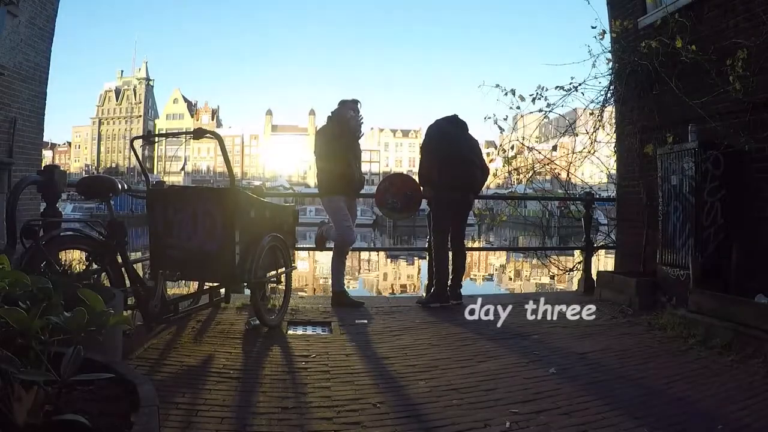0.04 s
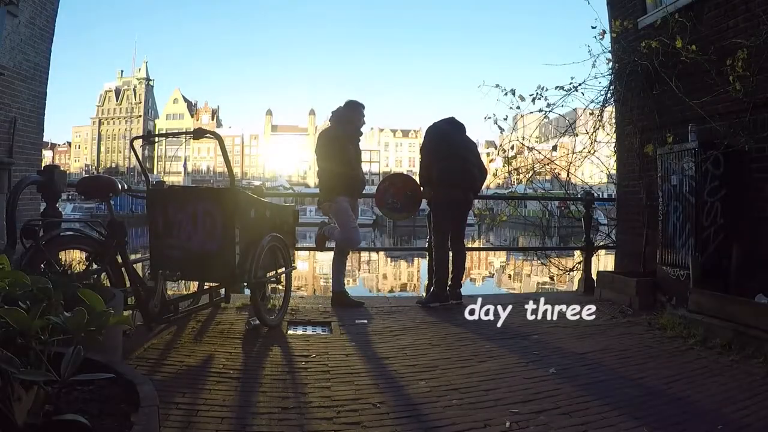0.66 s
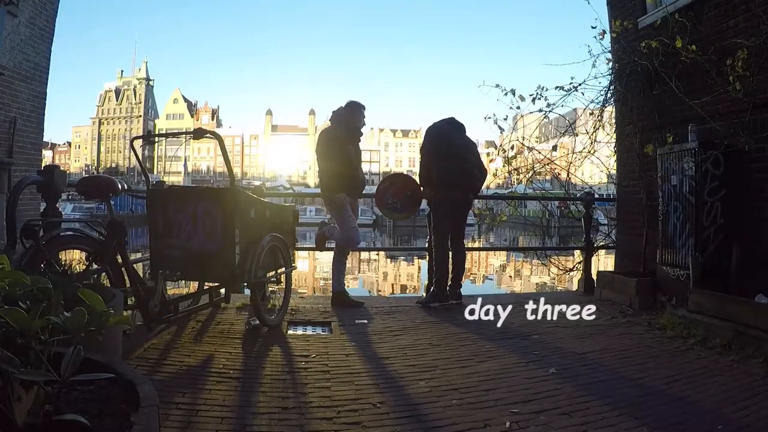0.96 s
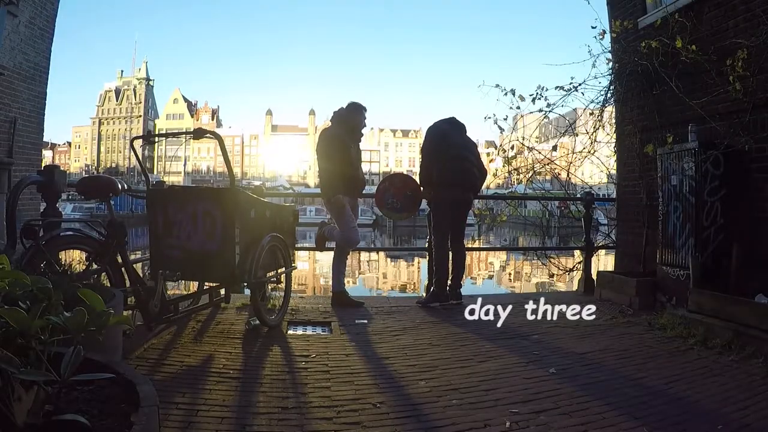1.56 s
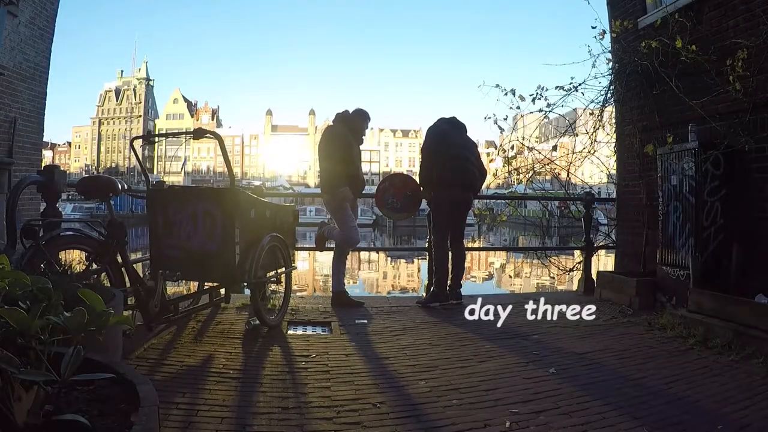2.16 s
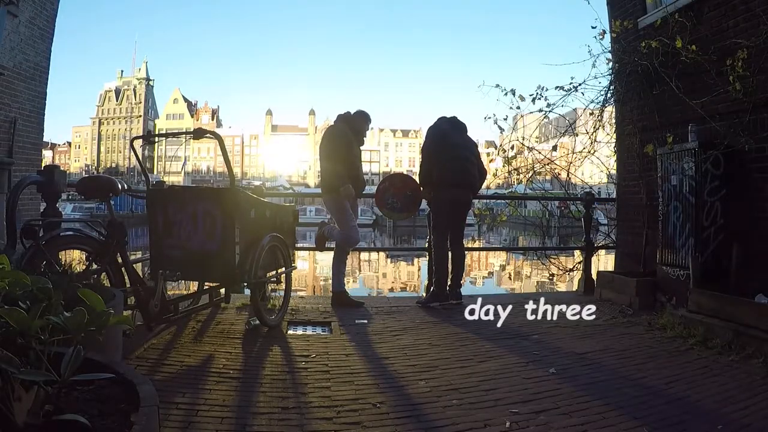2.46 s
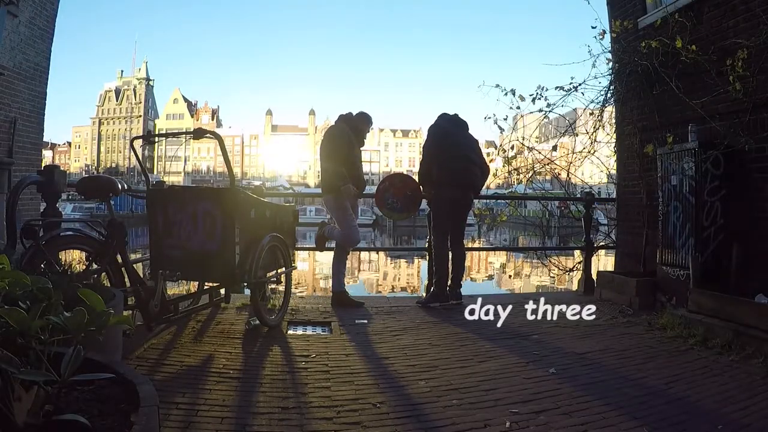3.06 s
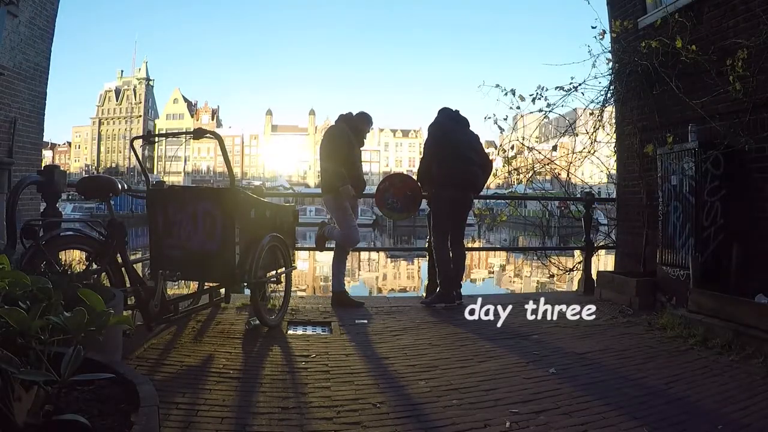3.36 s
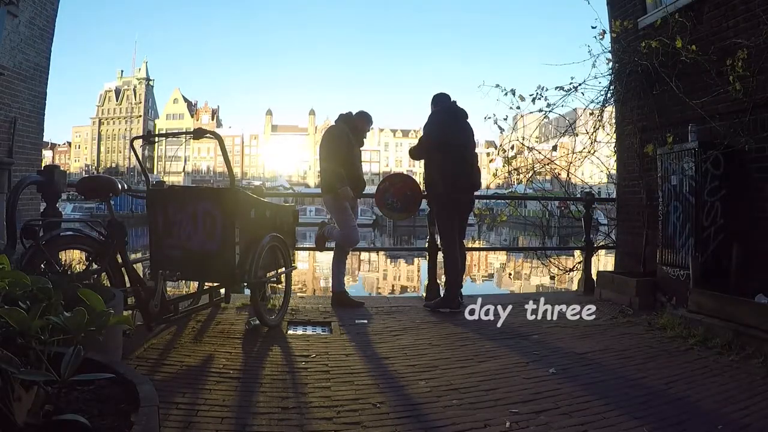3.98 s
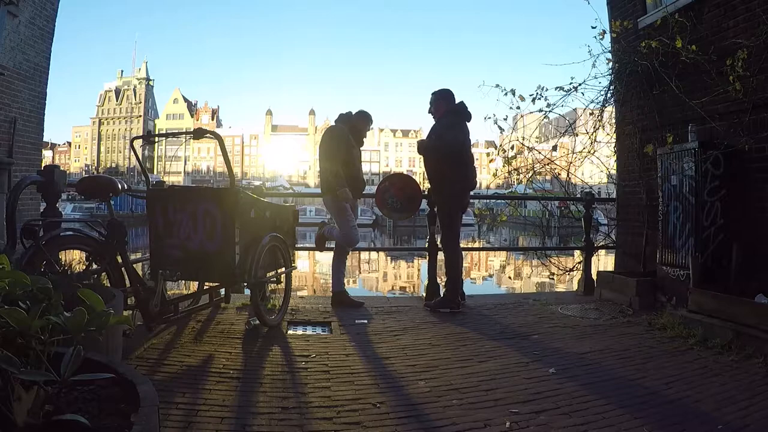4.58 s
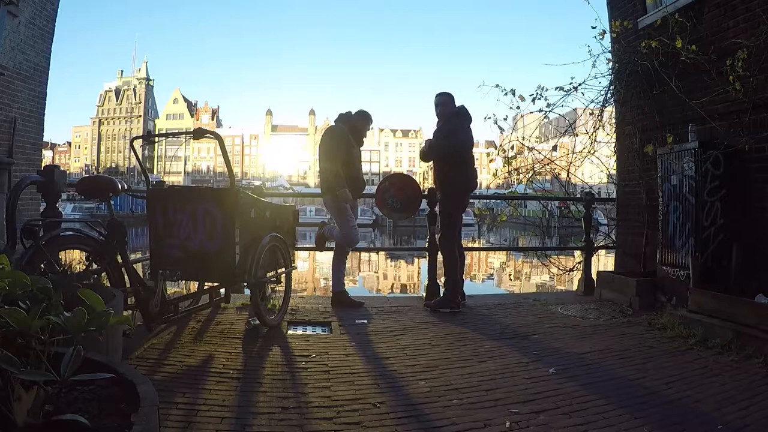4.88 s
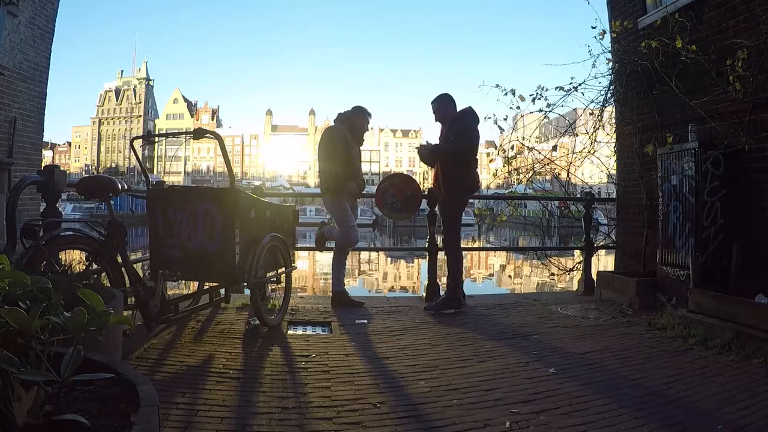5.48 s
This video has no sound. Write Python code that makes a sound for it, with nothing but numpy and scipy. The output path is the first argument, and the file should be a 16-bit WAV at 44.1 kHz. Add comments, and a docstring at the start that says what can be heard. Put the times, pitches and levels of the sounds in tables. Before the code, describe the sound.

Distant city traffic rumbles steadily beside a canal, with a wash of tyres, faint brake squeaks and a soft jacket rustle.

```python
"""A quiet city canal, heard from a brick passage. Distant traffic blurs into a steady rumble,
with the wash of tyres above it and the hum and drone of far engines. Brakes squeak faintly between
the houses, and the cloth of a winter jacket rubs and rustles a few steps away.
A small camera with two microphone ports adds its own hiss. Faint, steady high tones lie over it all."""
import sys
import numpy as np
from scipy import signal
from scipy.fft import rfft, irfft
from scipy.io import wavfile
from scipy.ndimage import uniform_filter1d

SR = 44100
rng = np.random.default_rng(int(sys.argv[2]) if len(sys.argv) > 2 else 0)


def waveform_to_disk(signal):
    """Save audio, clipped to [-1, 1], as 16-bit WAV at the path in sys.argv[1]."""
    frames = np.transpose(np.atleast_2d(signal))
    scaled = np.clip(frames, -1, 1) * 32767
    samples = np.round(scaled).astype(np.int16)
    wavfile.write(sys.argv[1], SR, samples)


N = 244118
TIME = np.arange(N) / SR
BINS = np.fft.rfftfreq(N, 1 / SR)

# the street's sound field at the two ports: f/Hz, coherence, left phase lead/rad, left minus right/dB
PORTS = [(30, 0.93, -0.069, -1.5), (87, 1, 0.0057, 0.5), (324, 0.95, 0.087, -1.5), (456, 0.89, 0.44, -2),
         (613, 0.65, -0.57, -3), (770, 0.02, 0.28, -3.5), (950, 0.51, -1.4, -1.5), (1480, 0.8, -1.56, -1.5),
         (2180, 0.5, -1.4, -1.1), (3040, 0.4, -0.067, -1), (4070, 0.82, -0.26, -0.5), (5200, 0.5, 0.86, -3)]


def rumble(level_db=-31, throb_db=0.17, lull_below_hz=234):
    """Incoherent summation: many vehicles blur to a roar whose long waves reach both ports alike."""
    spectrum = [(30, -3.5), (48, -2), (68, -1.5), (85, 1), (105, -2), (132, -1.5), (168, -9.5),
                (300, -11.5), (365, -14), (410, -21), (700, -33), (1500, -70.5)]  # traffic noise: f/Hz, relative spectral level/dB
    lulls = [(.91, 0.12, -2), (2.874, 0.066, -5.5), (3.266, 0.16, -4), (4.86, 0.22, -2.5)]  # brief dips of the bass: t/s, length/s, gain/dB
    roar = noise(spectrum, *per_bin(PORTS))
    running_rms = np.sqrt(uniform_filter1d((roar ** 2).mean(0), size=SR // 4))
    roar = roar / running_rms
    bass = irfft(rfft(roar) / (1 + (BINS / lull_below_hz) ** 10), N)
    lull_db = sum(db * hump(t, length) for t, length, db in lulls)
    return (roar - bass + bass * gain_of(lull_db)) * gain_of(level_db + throb_db * throb())


def surges():
    """Band-limited noise: each vehicle that pulls away swells its own part of the roar."""
    swells = [(.25, 0.36, 128, 0.73, -40), (0.947, 0.36, 310, 0.45, -42.5), (1.423, 0.2, 132, .4, -39),
              (1.462, 0.35, 367, 0.69, -42.5), (1.84, 0.42, 101, 1, -35.5), (2.116, 0.21, 90, 0.9, -35.5),
              (2.5, 0.58, 115, 0.73, -38), (2.53, 0.54, 346.5, 0.044, -45), (4.196, 0.93, 88, .4, -38.5),
              (5.066, 0.4, 242, 0.095, -41.5), (5.34, 0.43, 350, 0.73, -42.5)]  # vehicles pulling away: t/s, length/s, centre f/Hz, width/octaves, level/dB
    ports = per_bin(PORTS)
    return sum(noise(band(hz, octaves), *ports) * gain_of(db) * hump(t, length)
               for t, length, hz, octaves, db in swells)


def hum(hz=99, wander_hz=0.82, reference_db=-1):
    """Amplitude modulation: the joint note of two engines swells and ebbs unevenly."""
    envelope = [(0, -34), (.15, -41), (.85, -43.5), (1.05, -36), (1.27, -38), (1.4, -43.5), (1.5, -35.5),
                (2.05, -40.5), (2.19, -36), (2.35, -46), (2.75, -32.5), (2.88, -49), (3.0, -35),
                (3.14, -31), (3.3, -44), (4.35, -38.5), (4.52, -30.5), (4.75, -35.5), (4.87, -53),
                (5.1, -30.5), (5.25, -44), (5.54, -42.5)]  # course of the note: t/s, level/dB re reference_db
    level_db = reference_db + np.interp(TIME, *np.transpose(envelope))
    return tone(hz + wander_hz * drift(8.8)) * gain_of(level_db)


def diesel(hz=58.3, wander_hz=0.79, start_db=-40.5, rise_db_per_s=0.2, throb_db=1.5, fading_db=0.5):
    """Periodic firing: a diesel's deep note throbs, slowly grows louder and swells once under load."""
    pull_db = 9 * hump(t=0.77, length=0.31)
    level_db = start_db + rise_db_per_s * TIME + pull_db + throb_db * throb()
    return tone(hz + wander_hz * drift(8.9)) * gain_of(level_db - fading_db * drift(3))


def tyre_wash(level_db=-42, flutter_db=0.21):
    """Rolling noise: tyres across the water, dulled by distance, swell a little as each car passes."""
    spectrum = [(100, -3.5), (300, -7), (520, 0), (700, -3.5), (900, -4), (1200, -9), (1550, -10),
                (1800, -16), (2300, -20.5), (3200, -28), (4500, -34.5), (7000, -45), (14000, -68)]  # tyre noise: f/Hz, relative spectral level/dB
    return noise(spectrum, *per_bin(PORTS)) * gain_of(level_db + passing_db() + flutter_db * drift(11))


def drones(throb_db=0.1, fading_db=2):
    """Fading: the wavering notes of far engines and fans come and go between the houses."""
    engines = [(246.2, 2.69, -52), (274.2, 4.54, -52), (347.4, 6.57, -50.5), (519.4, 3.1, -64.5)]  # machine notes: f/Hz, rms wander/Hz, level/dB
    notes = sum(tone(hz + wander * drift(7.17)) * gain_of(db + fading_db * drift(2.8))
                for hz, wander, db in engines)
    return panned(notes * gain_of(throb_db * throb() + passing_db()), balance_db=0.3)


def brakes(jitter_hz=9, echo_db=-5):
    """Friction-excited vibration: far brakes squeak at a held or rising pitch and trail off in echo."""
    stops = [(.95, 0.063, 1547, -0.5, -59), (1.339, 0.16, 834, 200, -51), (1.6, .1, 3160, 0, -74),
             (2.302, .15, 3260, 148, -69.5), (2.43, .07, 3287, 0, -74), (2.8, .09, 1267, -2.5, -60),
             (3.05, .06, 1525, 803, -60), (3.098, 0.099, 1645, 1501, -57), (3.12, 0.076, 1900, 2001, -62),
             (3.22, .08, 2114, -1, -66), (3.6, .06, 1550, -2, -61), (4.43, .07, 1521, 0, -61),
             (5.332, .07, 1154, -1, -56)]  # brake squeaks: t/s, length/s, f/Hz, glide/(Hz/s), level/dB
    squeaks = sum(tone(hz + glide * (TIME - t) + jitter_hz * drift(70)) * gain_of(db) * hump(t, length)
                  for t, length, hz, glide, db in stops)
    return panned(squeaks + gain_of(echo_db) * street_echo(squeaks), balance_db=-2)


def jacket(grain_db=2, tick_decay_s=0.0067):
    """Sliding friction: arm movements rub cloth in grainy swishes; a zip and snapping folds tick."""
    rubs = [(.135, 0.051, 3220, .6, -66), (.6, .3, 6500, 2, -70), (.82, .1, 6800, 2.2, -63),
            (.92, .06, 6600, 1.2, -65.5), (3.353, 0.29, 4700, 2.4, -64.8), (3.396, .045, 4900, 1.8, -59),
            (3.797, .12, 5000, 1.8, -64), (4.075, .04, 5700, .45, -65), (4.125, .05, 5400, .6, -70),
            (4.15, 0.93, 5900, 1.1, -69.5), (4.597, 0.064, 6000, .35, -63.5)]  # arm movements: t/s, length/s, centre f/Hz, width/octaves, level/dB
    snaps = [(3.903, 4000, -59), (3.982, 7800, -59.5)]  # zip and folds: t/s, centre f/Hz, level/dB
    swishes = sum(cloth(hz, octaves) * gain_of(db) * hump(t, length)
                  for t, length, hz, octaves, db in rubs)
    ticks = sum(cloth(hz, octaves=0.81) * gain_of(db) * (TIME >= t)
                * np.exp(-abs(TIME - t) / tick_decay_s) for t, hz, db in snaps)
    return (swishes + ticks) * gain_of(grain_db * drift(150))


def cloth(hz, octaves, top_hz=7000):
    """Friction noise of nylon: one band of unit rms, with little top treble."""
    low_pass = signal.butter(4, top_hz, fs=SR, output="sos")
    return unit_rms(signal.sosfilt(low_pass, noise(band(hz, octaves), coherence=0.58)))


def far_whine(hz=1540, wander_hz=22, mean_db=-66.5, approach_db_per_s=0.5, fading_db=1.5):
    """Spreading loss: a motor's faint, blurred whine gains level as it draws nearer."""
    level_db = mean_db + approach_db_per_s * (TIME - TIME.mean()) + fading_db * drift(4.5)
    return panned(tone(hz + wander_hz * drift(9)) * gain_of(level_db), balance_db=-2)


def street_echo(x, t60_s=1):
    """Reverberation: the house fronts return a diffuse, decaying tail, different at each port."""
    tail = rng.standard_normal((2, SR)) * np.exp(-np.log(1000) * TIME[:SR] / t60_s)
    return signal.fftconvolve(x[None], tail / np.linalg.norm(tail[0]), axes=1)[:, :N]


def throb(period_s=0.661, crest_s=2.555):
    """Periodic modulation: the heavy engines swell and ebb, between -1 and 1."""
    return np.cos(2 * np.pi * (TIME - crest_s) / period_s)


def passing_db():
    """Pass-by: each car lifts the level most at its closest approach."""
    cars = [(.75, 2.1, 0.7), (2.3, 1.2, 0.1), (4.6, 0.6, 0.3), (5.3, 0.3, 0.5)]  # cars across the water: t/s, length/s, gain/dB
    return sum(db * hump(t, length) for t, length, db in cars)


def noise(spectrum, coherence=0, lead_rad=0, balance_db=0):
    """Partial coherence: coloured stereo noise of unit rms, with phase and level differences."""
    left, independent = rfft(rng.standard_normal((2, N)))
    right = (coherence * left + np.sqrt(1 - coherence ** 2) * independent) * np.exp(-1j * lead_rad)
    pair = np.array([left * gain_of(balance_db / 2), right * gain_of(-balance_db / 2)])
    return unit_rms(irfft(pair * gain_of(per_bin(spectrum)[0]), N))


def band(hz, octaves):
    """Gaussian spectrum of a given half-power width: rows of f/Hz, level/dB."""
    steps = np.linspace(-3, 3, 25)
    return np.transpose([hz * 2 ** (steps * octaves), -12 * steps ** 2])


def tone(hz):
    """Phase as the integral of frequency: a sine of unit rms."""
    return np.sqrt(2) * np.sin(2 * np.pi * (np.cumsum(hz * np.ones(N)) / SR + rng.random()))


def drift(rate_hz):
    """Random fluctuation: low-passed noise of unit rms."""
    low_pass = np.exp(-(BINS / rate_hz) ** 2) * (BINS > 0)
    return unit_rms(irfft(rfft(rng.standard_normal(N)) * low_pass, N))


def hump(t, length):
    """Gaussian envelope that peaks at t; length is its full width at 1/e."""
    return np.exp(-(2 * (TIME - t) / length) ** 2)


def panned(x, balance_db):
    """Level panning: the left channel exceeds the right by balance_db."""
    return x * gain_of([[balance_db / 2], [-balance_db / 2]])


def per_bin(table):
    """Log-frequency interpolation of a table's columns at every bin."""
    hz, *columns = np.transpose(table)
    return [np.interp(np.log(BINS + 1), np.log(hz + 1), column) for column in columns]


def gain_of(db):
    """Decibels to amplitude."""
    return 10 ** (np.asarray(db) / 20)


def unit_rms(x):
    """Normalisation to an rms of one."""
    return x / np.sqrt(np.mean(x ** 2) + 1e-20)


def scene():
    """Superposition: the street and the few small sounds over it add."""
    return (rumble() + surges() + tyre_wash() + drones() + far_whine() + hum() + diesel()
            + jacket() + brakes())


def record(dry, low_cut_hz=20, top_hz=14600):
    """Band limiting and self-noise: the camera trims both ends and hisses. Faint high tones sound too."""
    hiss_spectrum = [(1000, -6), (3000, -10), (4700, -5.5), (5400, 0.5), (5950, 2), (6800, -3), (8000, -8),
                     (10000, -7.5), (10900, -9.5), (11500, -15), (12800, -16), (14500, -28)]  # microphone hiss: f/Hz, relative spectral level/dB
    hiss_balance = [(5200, -1), (7000, -2.5), (8300, -4.5), (9800, -3.5), (11500, 0)]  # the hiss leans right: f/Hz, left minus right/dB
    steady_tones = [(5998, -89, -84.5), (8152, -97, -89), (8211, -94, -82), (12289, -103, -94)]  # faint, steady high tones: f/Hz, left level/dB, right level/dB
    street = signal.sosfilt(signal.butter(2, low_cut_hz, "high", fs=SR, output="sos"), dry)
    hiss = gain_of(db=-61.5) * noise(hiss_spectrum, balance_db=per_bin(hiss_balance)[0])
    high_tones = sum(gain_of([[left], [right]]) * tone(hz) for hz, left, right in steady_tones)
    low_pass = signal.firwin(511, top_hz, window=("kaiser", 9), fs=SR)
    return signal.oaconvolve(street + hiss + high_tones, low_pass[None], "same")


dry = scene()
out = record(dry)
waveform_to_disk(out)
```